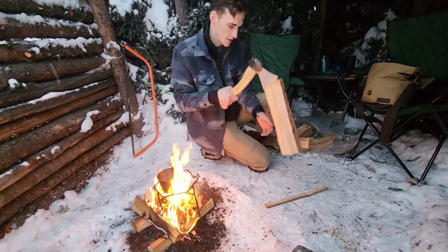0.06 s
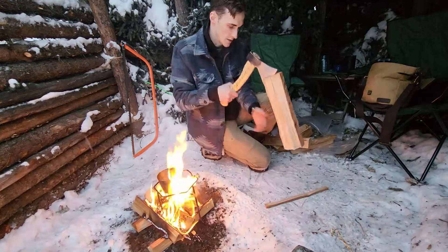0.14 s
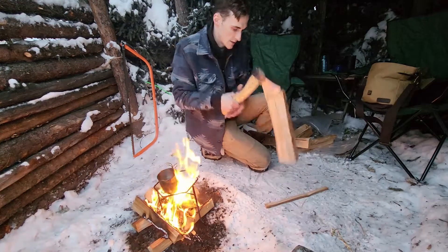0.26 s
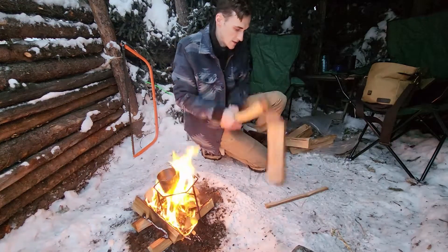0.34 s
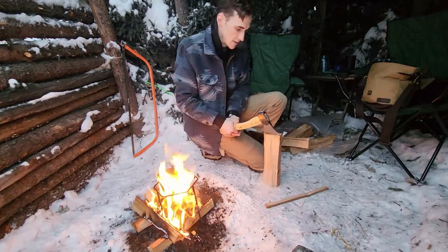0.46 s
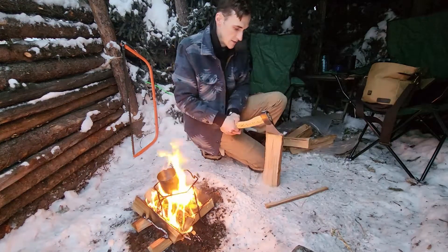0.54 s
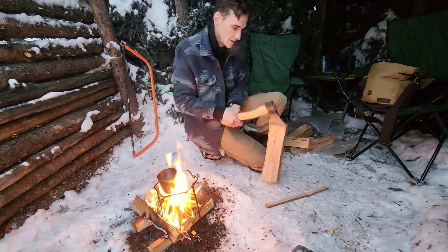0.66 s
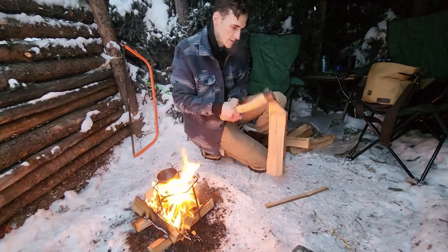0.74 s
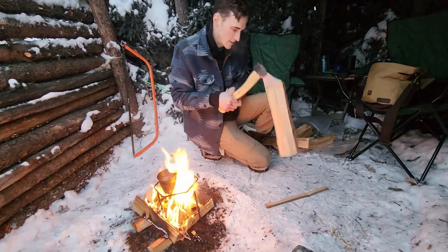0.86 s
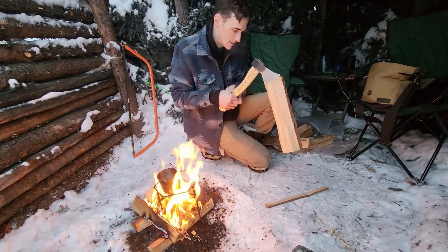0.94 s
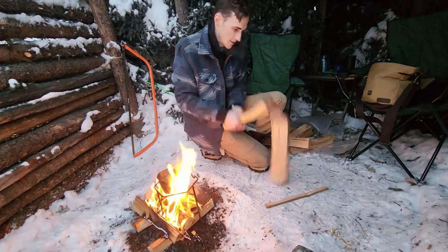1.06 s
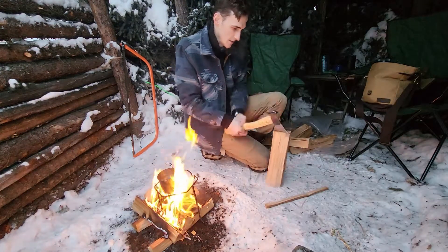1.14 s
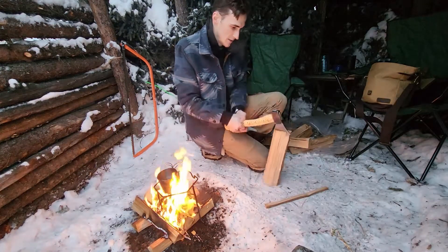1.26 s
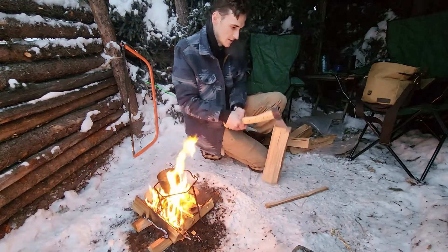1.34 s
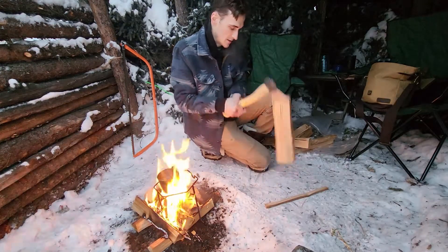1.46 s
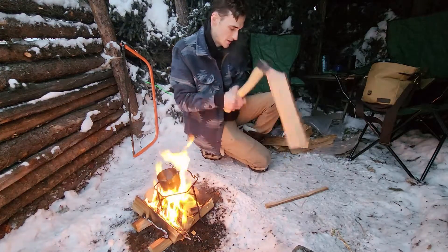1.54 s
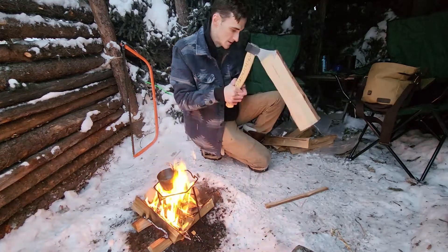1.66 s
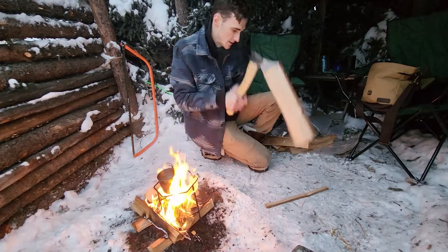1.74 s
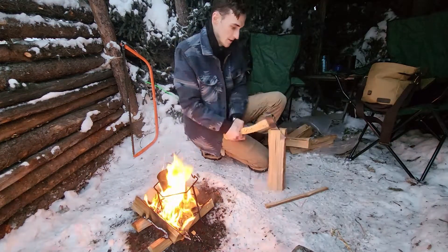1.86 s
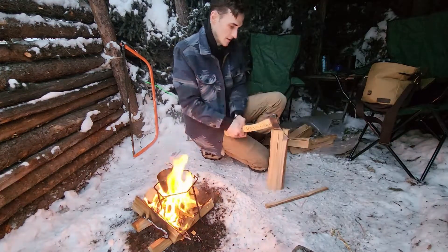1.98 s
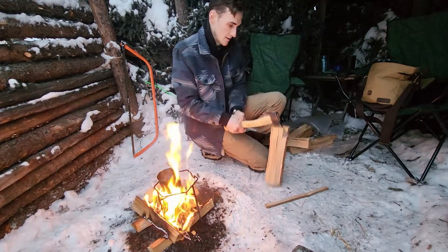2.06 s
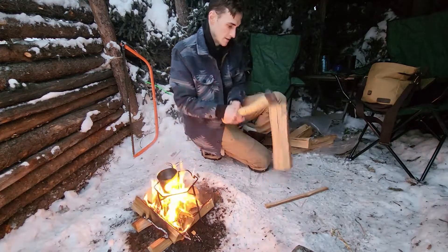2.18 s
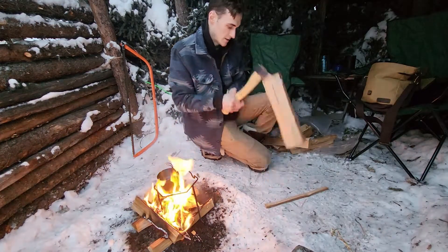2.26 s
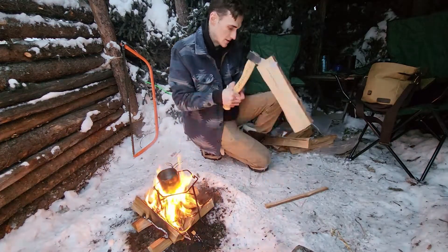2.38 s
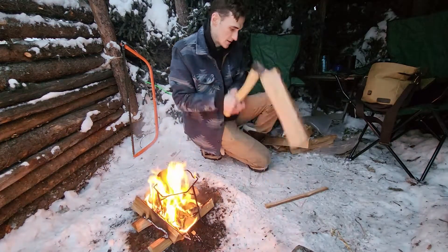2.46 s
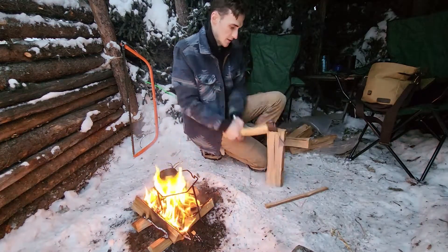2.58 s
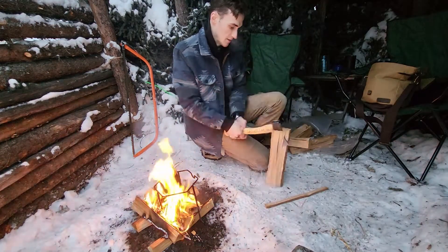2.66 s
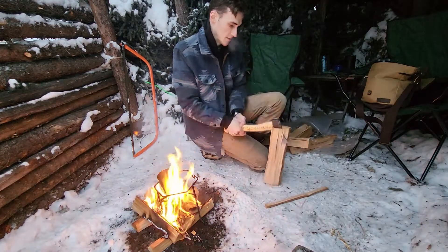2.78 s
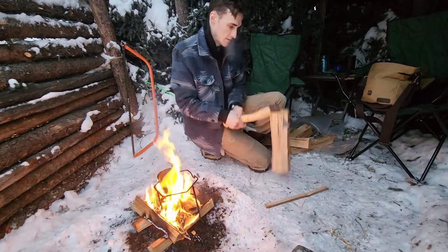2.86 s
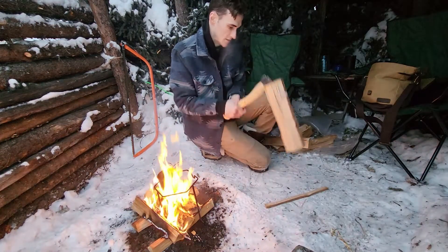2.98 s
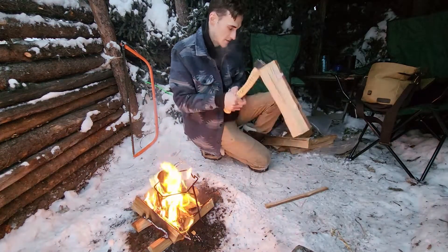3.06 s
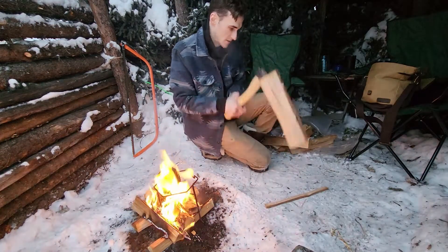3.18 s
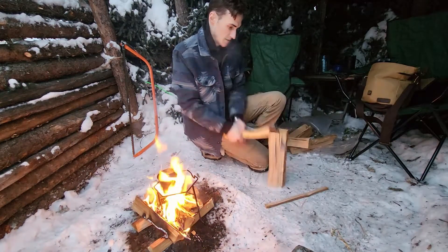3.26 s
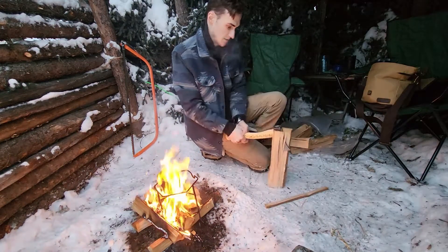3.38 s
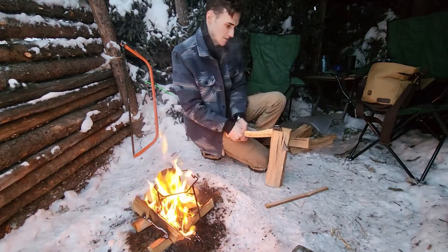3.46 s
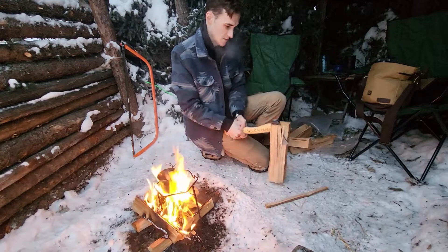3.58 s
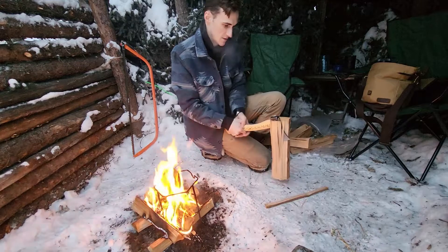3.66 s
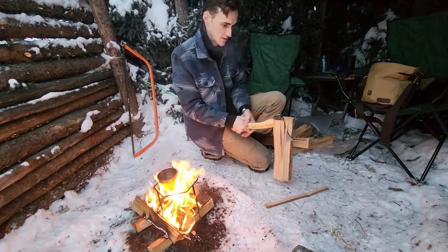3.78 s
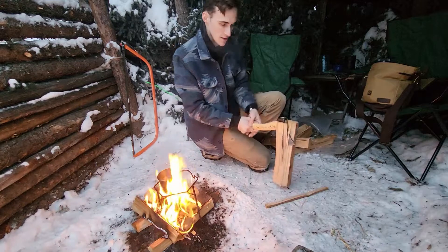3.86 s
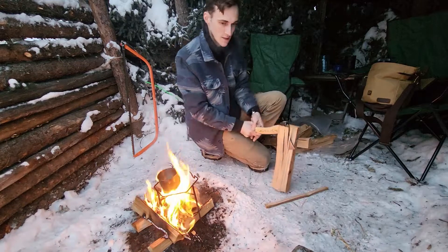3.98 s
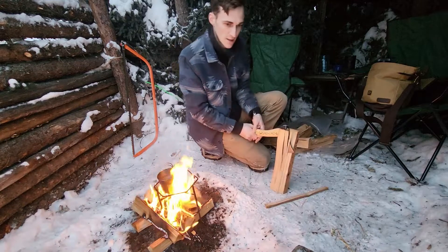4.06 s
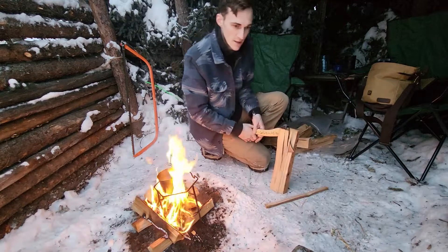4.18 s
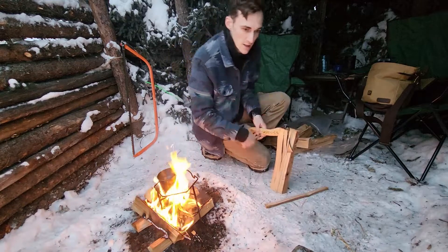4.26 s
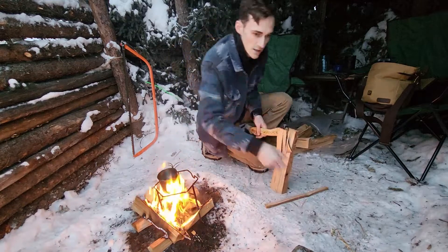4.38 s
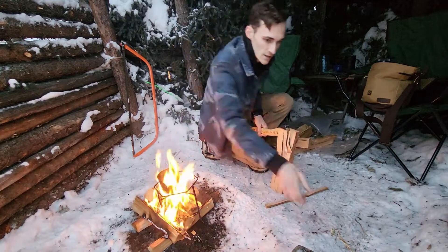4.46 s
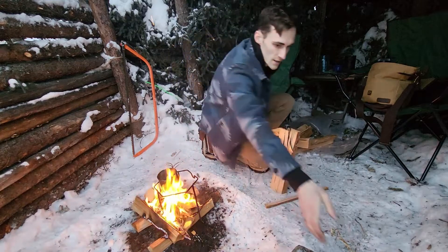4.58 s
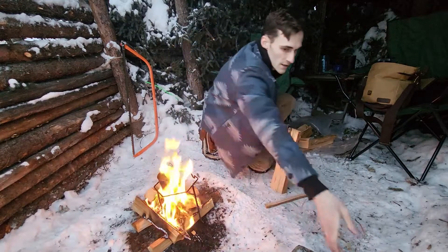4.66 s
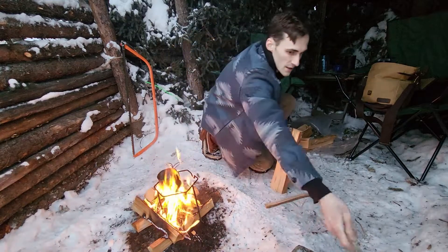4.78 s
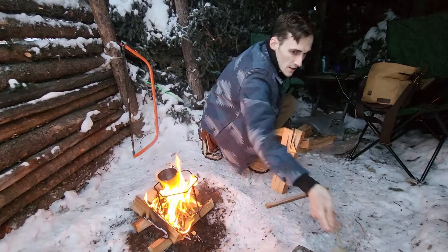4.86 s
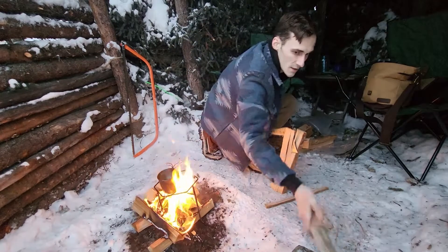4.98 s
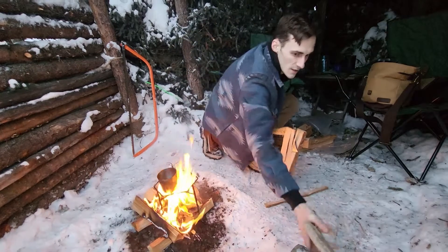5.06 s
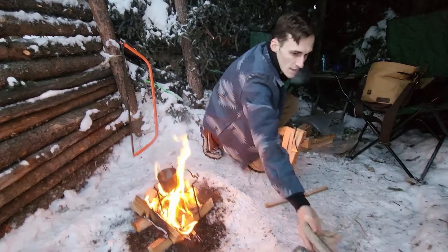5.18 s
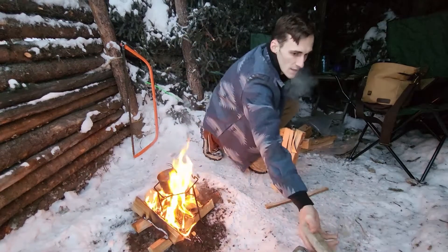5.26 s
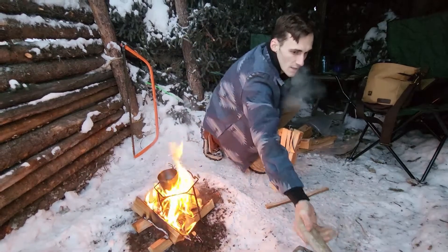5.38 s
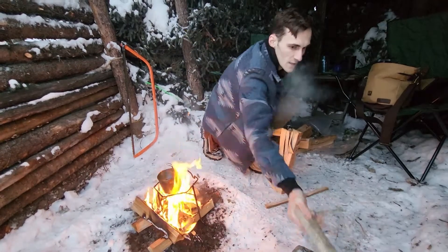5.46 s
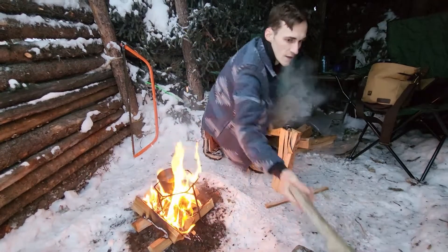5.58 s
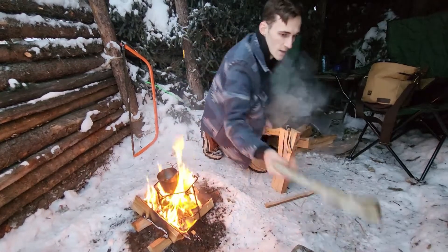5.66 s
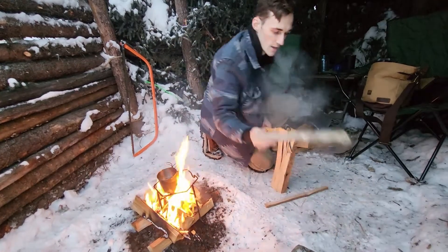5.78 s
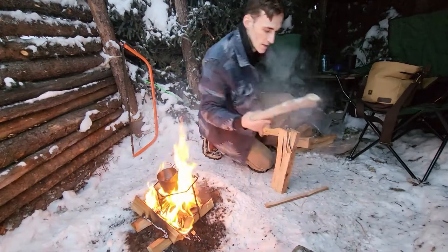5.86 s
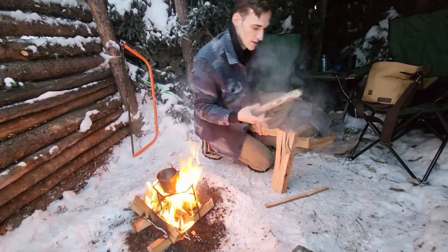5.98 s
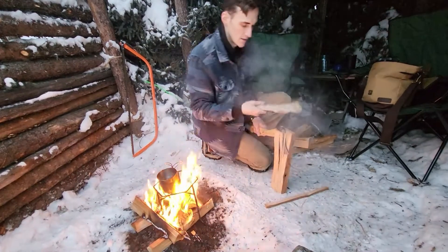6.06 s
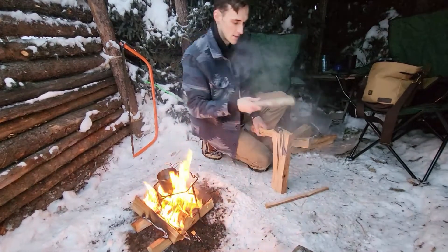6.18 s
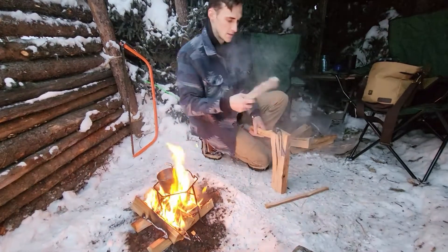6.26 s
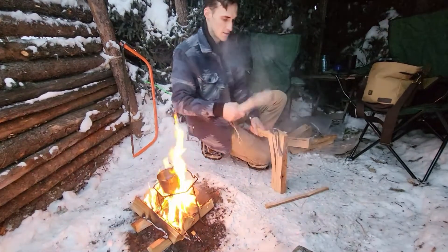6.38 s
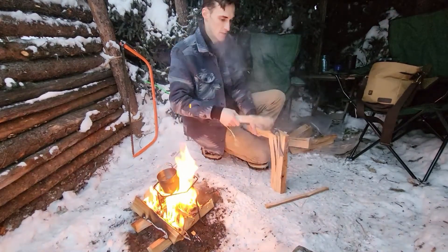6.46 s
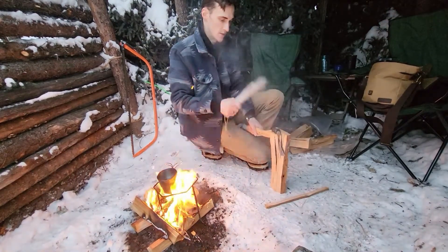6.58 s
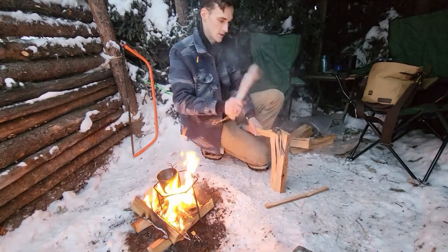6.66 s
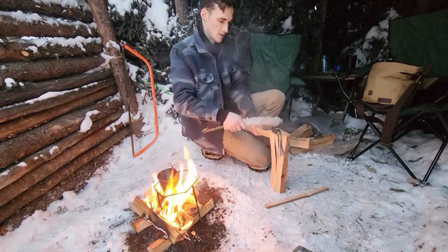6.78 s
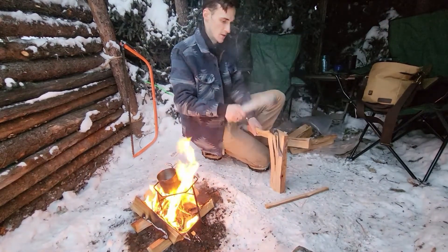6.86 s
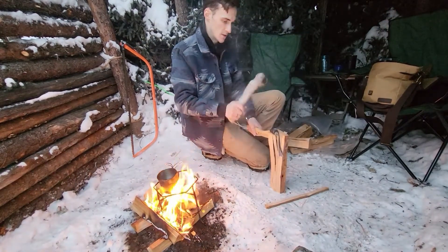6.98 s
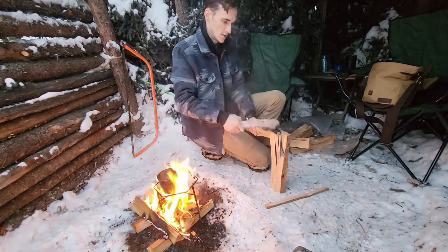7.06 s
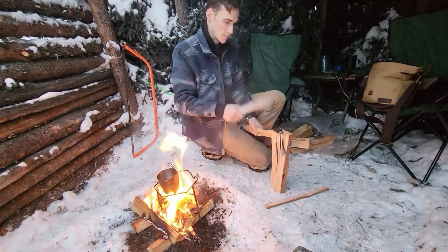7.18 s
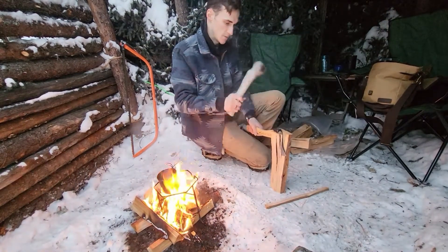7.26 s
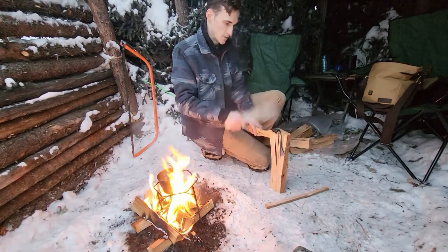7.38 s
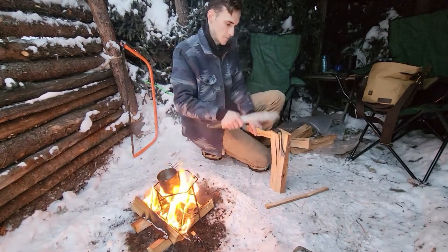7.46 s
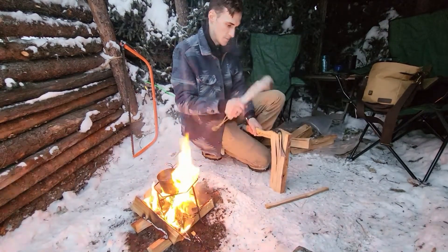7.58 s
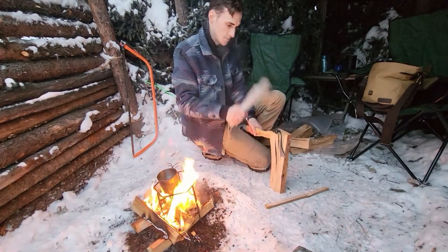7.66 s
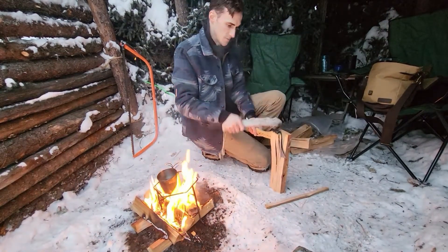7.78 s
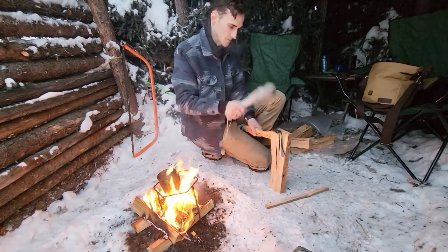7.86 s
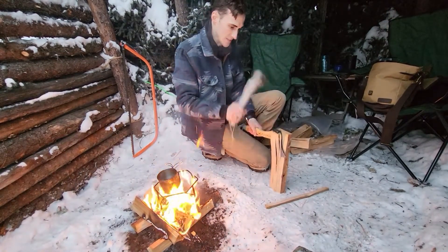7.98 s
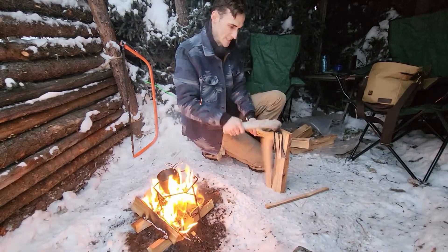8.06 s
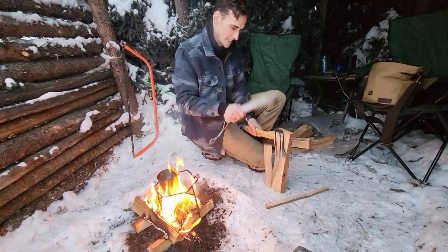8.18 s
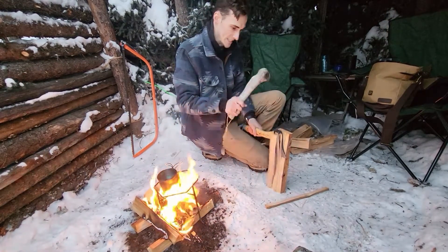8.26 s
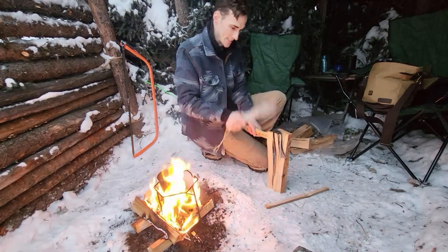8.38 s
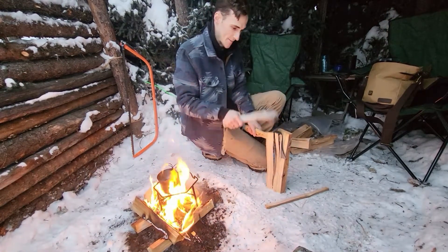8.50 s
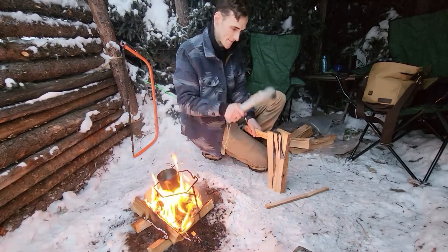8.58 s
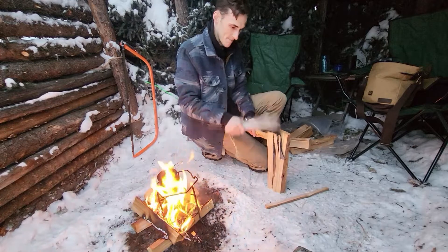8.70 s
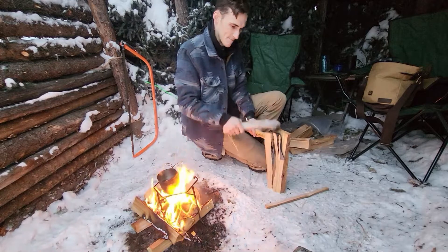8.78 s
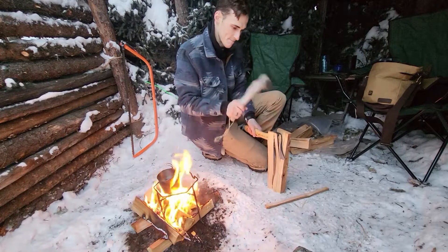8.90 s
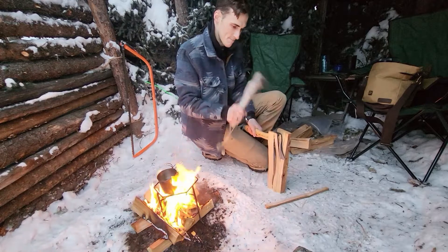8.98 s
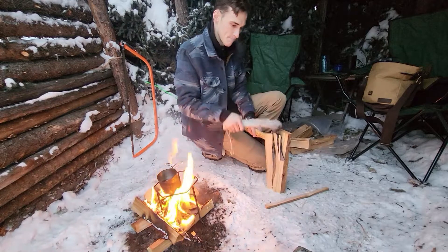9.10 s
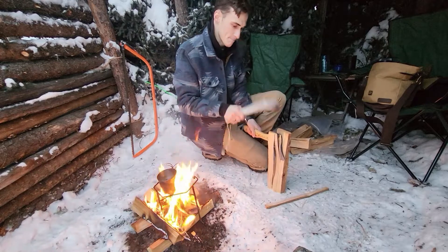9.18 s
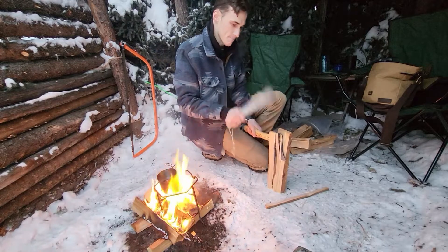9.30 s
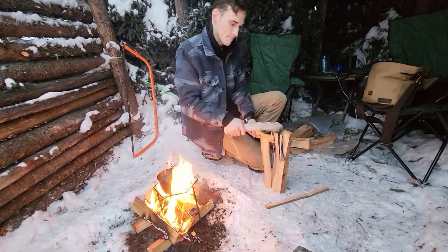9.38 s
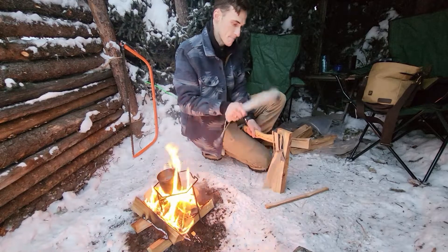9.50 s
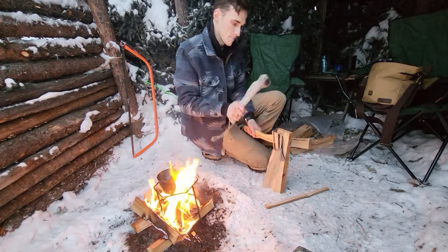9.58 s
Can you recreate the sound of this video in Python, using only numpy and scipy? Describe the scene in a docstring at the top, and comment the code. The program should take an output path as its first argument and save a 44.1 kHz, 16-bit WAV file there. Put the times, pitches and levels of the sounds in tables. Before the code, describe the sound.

A billet thuds five times on frozen ground, then a stick clacks ten times on a hatchet head, splitting the wood beside a faint campfire.

```python
"""Five hollow thuds: a billet with a hatchet stuck in it is slammed on frozen ground, then set down.
Its fibres crack, and a faint grainy tail follows each slam. A jacket rustles and a stick crunches out
of the snow, then clacks on the hatchet head ten times, driving the blade in until the wood rips open.
A log wall and the trees answer each blow; a small campfire flutters and ticks nearby."""
import sys
import numpy as np
from scipy import signal
from scipy.fft import rfft, irfft, next_fast_len
from scipy.io import wavfile
from scipy.ndimage import map_coordinates

SR = 44100
rng = np.random.default_rng(int(sys.argv[2]) if len(sys.argv) > 2 else 0)


def log_audio(samples):
    """Write samples as a 16-bit WAV file to the path given in sys.argv[1]."""
    # one column per channel
    frames = np.atleast_2d(samples).T
    # limit to full scale, then quantise
    limited = np.clip(frames, -1, 1)
    pcm = np.round(limited * 32767).astype(np.int16)
    wavfile.write(sys.argv[1], SR, pcm)


N = 424683
T = np.arange(SR // 4) / SR  # time axis of one hit, in seconds
WOOD_LAG_S = .0001  # the billet reaches the left channel this much later


# The billet lands; the last row sets it down: start_s, thud_db, splinter_db, ring_hz
GROUND_HITS = [(0.4589, -16, -31.5, 1557), (1.1897, -16.5, -32.5, 954), (1.932, -14, -25, 1020),
               (2.6627, -16.5, -27, 2023), (3.3668, -17, -24, 1993), (4.148, -36.5, -35.5, 2480)]
# Hollow ring of the billet on the ground: pitch_hz, level_db, t60_s
BILLET_MODES = [(256, -14.5, 0.11), (410.5, 0, 0.09), (446.2, 2.5, 0.054), (537, -7, 0.022),
                (655.7, -3, 0.071), (770, -10, 0.011), (1004, -7, 0.034), (1300, -13, 0.069),
                (1654, -8.5, 0.011), (1850, -6.5, .035), (1946, -9, 0.023), (2610, -11.5, 0.054),
                (2780, -12.5, 0.031), (3530, -14, 0.059)]
# Tone of the ground contact: freq_hz, gain_db
GROUND_EQ = [(60, -23), (150, -18.5), (400, 2), (1000, 5.5), (1900, -1.5), (3000, -10), (4500, -20.5),
             (8000, -24.5)]
def billet_slams():
    """The billet crushes the snow crust, then lands end first with a hollow thud."""
    hits = [(s, thud_db, -10.5 + .55 * thud_db, splinter_db, hz)  # the knock follows the thud
            for s, thud_db, splinter_db, hz in GROUND_HITS]
    out = blows(hits, BILLET_MODES, GROUND_EQ, lag_s=WOOD_LAG_S, spread_rad=0.45, crash_db=-4.0,
                contact_t60=0.018, scatter_db=-11, scatter_t60=0.09, thud_rise_s=0.0083,
                tear_db=-5.5, direct_share=0.98)
    for s, thud_db, *_ in GROUND_HITS[:-1]:
        crush = colour(noise(len(T)) * fade(0.032)[::-1], GROUND_EQ)  # swells into the hit
        add(out, s - T[-1], amp(thud_db - 15.5) * burst(crush))
    return out


# The stick hits the hatchet head: start_s, knock_db, ring_hz
STICK_HITS = [(6.53, -17, 1664), (6.852, -13, 2350), (7.1535, -13, 2330), (7.482, -12, 2435),
              (7.814, -12.5, 2360), (8.126, -11, 2350), (8.493, -13.5, 2300), (8.8065, -14, 2320),
              (9.128, -14, 2310), (9.439, -15, 2420)]
# Stick, hatchet and billet ringing together: pitch_hz, level_db, t60_s
HATCHET_MODES = [(250, -19, 0.12), (442.5, -8, 0.081), (768.5, -7.5, 0.051), (902.4, -4, 0.039),
                 (1266, -11.5, 0.13), (1380, 1.5, .045), (1430, -1, 0.025), (1820, -6.5, 0.082),
                 (1948, 2, 0.079), (2150, -3, .04), (2318, -1.5, 0.028), (2651, -6, 0.053),
                 (2880, -7.5, 0.019), (3250, -3.5, 0.026), (3427, -4.5, .03), (4230, -8, .025),
                 (5010, -18, 0.011), (5930, -15.5, .025)]
# Tone of the stick's contact: freq_hz, gain_db
CLACK_EQ = [(60, -30.5), (150, -22), (280, -6), (600, -5.5), (1300, -1), (2200, 0), (3000, -3.5),
            (4000, -4), (5000, -19), (8000, -44.5)]
def stick_knocks():
    """The stick on steel gives a hard, bright clack; the driven billet answers a moment later."""
    # each knock drives the blade deeper: less thud, more splintering
    hits = [(s, -25 - 1.02 * k, knock_db, -38.5 + 1.85 * k, hz)
            for k, (s, knock_db, hz) in enumerate(STICK_HITS)]
    clack = blows(hits, HATCHET_MODES, CLACK_EQ, lag_s=.00006, spread_rad=0.84, crash_db=-2.5,
                  contact_t60=.022, scatter_db=-12, scatter_t60=0.092, thud_rise_s=0.0049,
                  tear_db=-4.0, direct_share=.3)
    answer = echo(clack, delay_s=.01, smear_db=5.5, t60=0.035, level_db=-15.5,
                  eq=[(300, -1.5), (900, 0.5), (1500, -4), (2300, 1.5), (5000, -12.0)])
    return clack + answer


# Bright fizz of tearing fibres: freq_hz, gain_db
SPLINTER_EQ = [(800, -30), (2500, -2), (4500, -3), (6000, -3), (7600, 2.5), (8400, -13), (11000, -6.5),
               (16000, -7)]
def blows(hits, modes, eq, lag_s, spread_rad, crash_db, contact_t60, scatter_db, scatter_t60,
          thud_rise_s, tear_db, direct_share):
    """Each blow: ringing modes, a short contact crash, scatter from nearby things, and fibres tearing."""
    out = np.zeros((2, N))
    for s, thud_db, knock_db, splinter_db, ring_hz in hits:
        contact = aimed_noise(len(T), direct_share) * fade(contact_t60)
        scatter = amp(scatter_db) * noise(len(T)) * fade(scatter_t60)
        crash = colour(contact + scatter, eq)
        body = unit(ring(modes, lag_s, spread_rad)) + amp(crash_db) * unit(crash)
        # the heavy wood takes a moment to get moving
        thud = band(body * (1 - np.exp(-T / thud_rise_s)), 680, 'low', order=4)
        # the point of contact favours one ring
        ring_eq = [(ring_hz / 1.25, 0), (ring_hz, 6), (ring_hz * 1.2, 0)]
        knock = colour(band(body, 770, 'high', order=4), ring_eq)
        # the more wood tears, the longer it takes and the more fine fibres fizz
        crackle = unit(grainy(len(T), depth_db=3, size=64)) * fade(.21 * 2 ** (splinter_db / 19))
        tear = aimed_noise(len(T), direct_share) * fade(0.0027) + amp(tear_db) * crackle
        fizz_eq = [(7000, 0.006), (10000, 0.59 * min(splinter_db + 24.0, 0))]
        splinters = colour(colour(tear, SPLINTER_EQ), fizz_eq)
        for db, layer in (thud_db, thud), (knock_db, knock), (splinter_db, splinters):
            add(out, s, amp(db) * burst(layer))
    return out


def ring(modes, lag_s, spread_rad):
    """Damped modes, struck afresh each time; left and right drift out of phase as reflections join."""
    out = np.zeros((2, len(T)))
    for hz, db, t60 in modes:
        strength, detune, phase, skew = rng.standard_normal(4)
        apart = np.pi * hz * lag_s + spread_rad * np.sign(skew) * (min(hz / 1500, 1) + T / 0.011)
        angle = 2 * np.pi * hz * (1 + 0.011 * detune) * T + phase
        # high modes speak loudest while the two pieces are still in contact
        decay = fade(t60) + 0.89 * min(hz / 1800, 1) * np.exp(-(T / 0.0072) ** 2)
        out += amp(db + 2.0 * strength) * decay * np.sin(angle + np.array([-apart, apart]))
    return out * (1 - np.exp(-T / 0.00011))


# Wood fibres and twigs snap: start_s, body_db, snap_db
SNAPS = [(0.3965, -51.5, -60), (1.03, -54, -57.5), (2.6466, -44, -46), (2.7855, -66, -53),
         (2.8484, -37.5, -27.5), (2.9173, -55, -42.5), (3.1905, -39.5, -26.5), (3.85, -67, -51.5),
         (5.395, -43, -32.5), (5.578, -44.5, -45), (7.3497, -67, -52), (7.6924, -59.5, -44),
         (7.7332, -60, -45.5), (7.9554, -57, -49.5), (8.0083, -67.5, -50.5), (8.1528, -27, -29.5),
         (8.1592, -23, -17.5), (8.166, -27, -25), (8.3512, -35, -44), (8.6278, -43.5, -48),
         (9.2726, -56, -51)]
# Woody body under a snap: freq_hz, gain_db
SNAP_BODY_EQ = [(150, -23), (500, -11), (900, -1.5), (1800, -1.5), (3000, -1), (5000, -9.5), (9000, -41.5)]
def fibre_cracks():
    """Fibres let go with a dry snap that also sounds the wood."""
    out = np.zeros((2, N))
    for s, body_db, snap_db in SNAPS + strain_ticks():
        # the harder the snap, the longer the fibres go on tearing
        tearing = fade(0.23 * 2 ** (snap_db / 23))
        body = noise(len(T)) * (fade(0.015) + 0.41 * tearing + .1 * fade(0.21))
        body = colour(body, ripple(SNAP_BODY_EQ, depth_db=7.5))
        snap = grainy(len(T), depth_db=4.5) * (fade(0.021) + 0.5 * tearing)
        snap = colour(snap, ripple(SPLINTER_EQ, depth_db=4.5))
        add(out, s, amp(body_db) * burst(body) + amp(snap_db) * burst(snap))
    return out


# The hatchet is worked in the billet: start_s, end_s, ticks_per_s, level_db
STRAIN_SPANS = [(1.429, 1.62, 13, -63.5), (3.68, 4.02, 12, -61)]
def strain_ticks():
    """Strained fibres tick unevenly; returns rows of start_s, body_db, snap_db."""
    ticks = []
    for start_s, end_s, rate, db in STRAIN_SPANS:
        for s in np.arange(start_s, end_s, 1 / rate):
            snap_db = db + 1.5 * rng.standard_normal()
            ticks.append((s + .5 * rng.random() / rate, snap_db - 19.5, snap_db))
    return ticks


def billet_split(start_s=8.135, level_db=-32, t60=0.34):
    """The billet rips open along its grain."""
    out = np.zeros((2, N))
    rip = colour(grainy(len(T), depth_db=4, size=64) * fade(t60), SPLINTER_EQ)
    add(out, start_s, amp(level_db) * burst(rip))
    return out


# The billet drops back after a hard knock: start_s, level_db
KNOCK_HOPS = [(7.498, -32.5), (7.842, -35.5), (8.836, -32)]
def rebounds(flight_s=.057):
    """The billet hops and lands again softly, after every ground hit and three of the knocks."""
    out = np.zeros((2, N))
    ground_hops = [(s + flight_s, thud_db - 27.5) for s, thud_db, *_ in GROUND_HITS]
    for s, db in KNOCK_HOPS + ground_hops:
        landing = ring(BILLET_MODES, WOOD_LAG_S, spread_rad=0.63) * (1 - np.exp(-T / 0.0027))
        add(out, s, amp(db) * burst(landing))
    return out


def steel_ring(pitch_hz=3420, t60=0.56):
    """The hatchet head sings on, thin and faint, after each knock."""
    out = np.zeros((2, N))
    for s, knock_db, _ in STICK_HITS:
        tone = fade(t60) * np.sin(2 * np.pi * pitch_hz * T + rng.uniform(0, 2 * np.pi, (2, 1)))
        add(out, s, amp(knock_db - 44) * burst(tone))
    return out


# Bright tone of the tail after a ground hit: freq_hz, gain_db
TAIL_EQ = [(400, -14.5), (1000, -2), (2000, 1), (3200, -1), (5000, -8.5), (7500, -5.5), (9000, -17),
           (16000, -13.5)]
def slam_scatter(delay_s=0.056):
    """A faint, grainy, bright tail follows each ground hit."""
    out = np.zeros((2, N))
    for s, thud_db, *_ in GROUND_HITS:
        tail = colour(grainy(len(T), depth_db=4.5, size=96) * fade(0.25), TAIL_EQ)
        add(out, s + delay_s, amp(thud_db - 34.5) * burst(tail))
    return out


# Soft contacts with the snow: start_s, low_db, body_db
SNOW_BUMPS = [(4.994, -47, -34), (5.171, -32, -34.5), (5.223, -30, -31), (5.283, -35.5, -46),
              (5.396, -50, -45), (5.581, -46, -42), (8.166, -39.5, -52)]
# Low weight of the ground: freq_hz, gain_db
RUMBLE_EQ = [(25, -20.5), (70, 3), (130, -7.5), (230, 1), (400, -11), (900, -33.5), (3000, -61.5)]
# Padded midrange of a bump: freq_hz, gain_db
BUMP_EQ = [(120, -24.5), (350, 3), (700, -2.5), (1300, -3.5), (3000, -23.5), (7500, -23.5), (9000, -32.5),
           (16000, -28)]
def snow_bumps():
    """Wood, knees and hands bump on the snow; the softer the bump, the duller it is."""
    out = np.zeros((2, N))
    for s, low_db, body_db in SNOW_BUMPS:
        low = colour(noise(len(T)) * fade(0.06), RUMBLE_EQ)
        body = colour(noise(len(T)) * fade(0.075), ripple(BUMP_EQ, depth_db=2.5))
        body = colour(body, [(1500, 0.0011), (6000, .5 * min(body_db + 28.5, 0))])
        add(out, s, amp(low_db) * burst(low) + amp(body_db) * burst(body))
    return out


# Crunch of breaking snow crust: freq_hz, gain_db
CRUST_EQ = [(180, -35), (300, -2), (478, -14), (801, 3.5), (915, -3), (1210, -2.5), (1720, -7.5),
            (3800, -14), (7440, -17.5), (9090, -28.5), (16000, -26)]
def stick_drag(start_s=4.915, length_s=.68, attack_s=0.082, release_s=0.13, lumps=36):
    """The stick scrapes through crusty snow: it bites at once, then eases as it comes free."""
    stroke = start_s, length_s, attack_s, release_s
    crunch_gain = swell(*stroke, level_db=-37.5, sag_db_per_s=47)
    rumble_gain = swell(*stroke, level_db=-39.5, sag_db_per_s=17.5)
    grit = grainy(N, depth_db=3.5, size=96) * amp(6.1 * wobble(70))
    out = 0.66 * crunch_gain * unit(colour(grit, CRUST_EQ))
    for s in np.linspace(start_s, start_s + length_s, lumps) + rng.normal(0, .004, lumps):
        # every lump of crust breaks with its own pitch
        lump = colour(noise(len(T)) * fade(0.032), ripple(CRUST_EQ, depth_db=6.0))
        add(out, s, crunch_gain[round(s * SR)] * amp(-1.0 + 5.9 * rng.standard_normal()) * burst(lump))
    rumble = unit(colour(noise(N) * amp(1.7 * wobble(30)), RUMBLE_EQ))
    return out + rumble_gain * rumble


# Arm moves that stir the jacket: start_s, length_s, level_db
ARM_MOVES = [(4.398, 0.35, -57), (4.742, 0.047, -45), (4.944, 0.56, -54.5), (6.048, 0.63, -54.5)]
# Tone of the cloth: freq_hz, gain_db
CLOTH_EQ = [(100, -20), (250, 4.5), (500, 4), (750, 4), (1000, -8), (1400, -5), (2500, -14.5),
            (4000, -20.5), (7500, -25), (9000, -37)]
def jacket_rustle():
    """Folds flutter in the low band while the weave slides evenly above them."""
    cloth = colour(noise(N), CLOTH_EQ)
    folds = unit(band(cloth, 950, 'low') * amp(5 * wobble(90)))
    weave = unit(band(cloth, 1100, 'high') * amp(1.6 * wobble(23)))
    motion = sum(swell(s, length, 0.66 * length, 0.57 * length, db) for s, length, db in ARM_MOVES)
    return motion * (amp(-3.5) * folds + amp(-11) * weave) + jacket_flaps(motion)


def jacket_flaps(motion, folds=8, flips_per_s=22):
    """Stiff folds flip over at random while the jacket moves, each with its own tone."""
    out = np.zeros((2, N))
    for _ in range(folds):
        flips = (rng.random(N) < flips_per_s / folds / SR) * amp(-1 + 4 * rng.standard_normal(N))
        flap = burst(colour(noise(len(T)) * fade(0.013), ripple(CLOTH_EQ, depth_db=1)))
        flap = band(flap, 1500, 'low', order=2)
        out += signal.oaconvolve((motion * flips)[None], flap, axes=1)[:, :N]
    return out


def camp_echoes(wood):
    """A faint early reflection, a slap off the log wall and a long wash from the trees."""
    near = echo(wood, delay_s=.046, smear_db=-5.5, t60=.03, level_db=-36.5,
                eq=[(300, -1.5), (2000, -4), (6000, 5.0)])
    wall = echo(wood, delay_s=.058, smear_db=-5, t60=.085, level_db=-28.5,
                eq=[(230, -12.5), (450, -4), (1000, 3), (2000, -6), (6000, 1.0), (15000, -1.0)])
    trees = echo(wood, delay_s=.08, smear_db=9, t60=0.57, level_db=-53.5,
                 eq=[(300, -11.5), (1000, 0), (3000, 0), (7000, 5.5), (15000, 0)])
    return near + wall + trees


def echo(x, delay_s, smear_db, t60, level_db, eq):
    """A reflection from a rough surface: one clear return and a smear."""
    response = amp(smear_db) * unit(noise(len(T)) * fade(t60)) / np.sqrt(len(T))
    response[:, 0] += 1
    back = colour(signal.fftconvolve(x, response, axes=1)[:, :N], eq)
    return amp(level_db) * np.pad(back, ((0, 0), (round(delay_s * SR), 0)))[:, :N]


# Low bed of flames and still air: freq_hz, gain_db
FLAME_EQ = [(20, -10), (45, -5.5), (70, 0.5), (140, -12), (260, -19.5), (410, -17.5), (560, -28.5),
            (900, -34.5), (1440, -27.5), (2100, -33.5), (2500, -40), (4500, -43.5), (7500, -40.5),
            (8600, -47), (16000, -42.5)]
def campfire(bed_db=-60, settle_s=0.99, flutter_db=2.1, ticks_per_s=3, tick_db=-69.5):
    """Flames flare at first, then settle to a flutter; embers tick now and then."""
    flare_db = 3.5 * np.exp(-np.arange(N) / SR / settle_s)
    flames = amp(bed_db + flare_db + flutter_db * wobble(26)) * unit(colour(noise(N), FLAME_EQ, 8192))
    pops = (rng.random(N) < ticks_per_s / SR) * amp(3.4 * rng.standard_normal(N))
    tick = burst(colour(noise(len(T)) * fade(0.036), SPLINTER_EQ))
    return flames + amp(tick_db) * signal.fftconvolve(pops[None], tick, axes=1)[:, :N]


# Stereo image of the noise: freq_hz, left_right_correlation
STEREO_LIKENESS = [(50, 0.98), (150, 0.9), (300, 0.44), (600, 0.063), (2000, 0), (10000, 0)]
def noise(count):
    """White stereo noise, centred in the bass and wide in the treble."""
    m = next_fast_len(count)
    width = np.arccos(np.clip(along(STEREO_LIKENESS, np.fft.rfftfreq(m, 1 / SR)), -1, 1)) / 2
    mid, side = irfft(rfft(rng.standard_normal((2, m))) * [np.cos(width), np.sin(width)], m)[:, :count]
    return np.array([mid + side, mid - side])


def aimed_noise(count, share):
    """White noise, this share of its power straight from the billet and the rest from all around."""
    m = next_fast_len(count)
    shift = np.exp(1j * np.pi * WOOD_LAG_S * np.fft.rfftfreq(m, 1 / SR))
    direct = irfft(rfft(rng.standard_normal(m)) * [1 / shift, shift], m)[:, :count]
    return np.sqrt(share) * direct + np.sqrt(1 - share) * noise(count)


def grainy(count, depth_db, size=48):
    """Noise broken into grains of random level, each size samples long."""
    levels = np.clip(rng.standard_normal(count // size + 1), -3, 2.5)
    return noise(count) * np.repeat(amp(depth_db * levels), size)[:count]


def wobble(rate_hz):
    """A random curve that glides between rate_hz points a second."""
    knots = rng.standard_normal(int(N * rate_hz / SR) + 4)
    return map_coordinates(knots, [np.arange(N) * rate_hz / SR], order=1)


def swell(start_s, length_s, attack_s, release_s, level_db, sag_db_per_s=0):
    """Envelope: up 30 dB per attack_s until start_s, a sagging hold, down 30 dB per release_s."""
    t = np.arange(N) / SR - start_s
    outside = np.maximum(-t / attack_s, 0) + np.maximum((t - length_s) / release_s, 0)
    return amp(level_db - sag_db_per_s * np.clip(t, 0, length_s) - 30 * outside)


def fade(t60):
    """A decay of 60 dB in t60 seconds."""
    return np.exp(-np.log(1000) * T / max(t60, 1e-3))


def ripple(eq, depth_db, count=40):
    """An EQ curve with chance peaks: every piece has its own resonances."""
    hz = np.geomspace(eq[0][0], eq[-1][0], count)
    return np.transpose([hz, along(eq, hz) + depth_db * rng.standard_normal(count)])


def colour(x, eq, size=2048):
    """Minimum-phase EQ through (freq_hz, gain_db) points."""
    cepstrum = irfft(np.log(amp(along(eq, np.fft.rfftfreq(size, 1 / SR)))))
    cepstrum[1:size // 2] *= 2
    cepstrum[size // 2 + 1:] = 0
    return signal.fftconvolve(x, irfft(np.exp(rfft(cepstrum)))[None], axes=1)[:, :x.shape[1]]


def band(x, hz, kind, order=3):
    """Causal low-pass or high-pass."""
    return signal.sosfilt(signal.butter(order, hz, kind, fs=SR, output='sos'), x)


def along(points, hz):
    """Read a (freq_hz, value) curve on a log frequency axis."""
    freqs, values = np.transpose(points)
    return np.interp(np.log(hz + 1), np.log(freqs), values)


def amp(db):
    """Decibels to gain."""
    return 10 ** (np.asarray(db) / 20)


def unit(x):
    """Scale to rms 1."""
    return x / np.sqrt(np.mean(x ** 2) + 1e-20)


def burst(x):
    """Scale a short sound to the energy of rms 1 over 20 ms."""
    return unit(x) * np.sqrt(.02 * SR / x.shape[-1])


def add(track, s, x):
    """Mix x into the track at s seconds."""
    i = round(s * SR)
    track[:, i:i + x.shape[1]] += x[:, :N - i]


def scene():
    """The woodwork with its echoes, the reach for the stick a little to the right, and the fire."""
    wood = billet_slams() + slam_scatter() + stick_knocks() + steel_ring()
    wood += rebounds() + billet_split() + fibre_cracks()
    echoes = camp_echoes(wood)
    reach = stick_drag() + jacket_rustle() + snow_bumps()
    return wood + echoes + reach * amp([[-0.93], [0.93]]) + campfire()


def record(dry, top_hz=16100):
    """Peaks round off near full scale; the treble rolls off steeply around top_hz."""
    rounded = dry / (1 + np.abs(dry) ** 6) ** (1 / 6)
    m = next_fast_len(N + SR // 2)
    passband = np.clip((top_hz - np.fft.rfftfreq(m, 1 / SR)) / 900 + .5, 0, 1)
    return irfft(rfft(rounded, m) * np.sin(np.pi / 2 * passband) ** 2, m)[:, :N]


dry = scene()
out = record(dry)
log_audio(out)
```